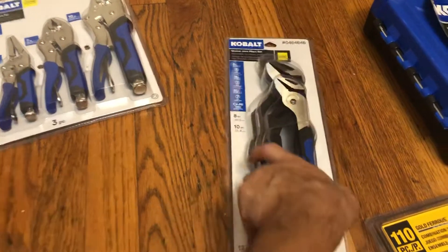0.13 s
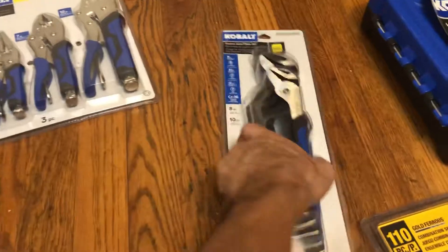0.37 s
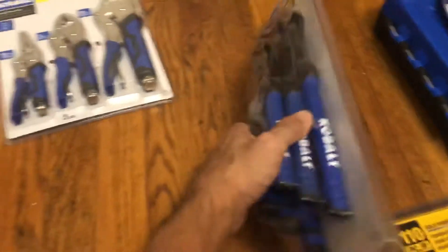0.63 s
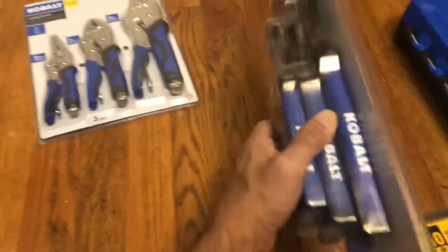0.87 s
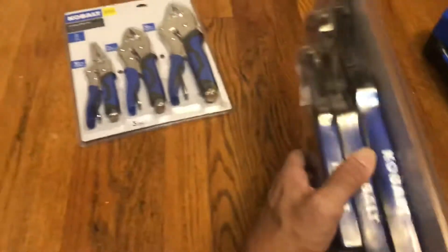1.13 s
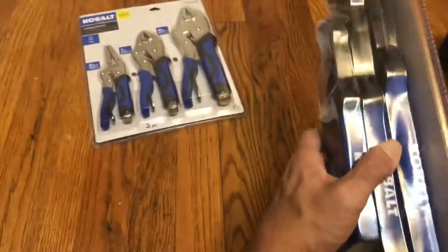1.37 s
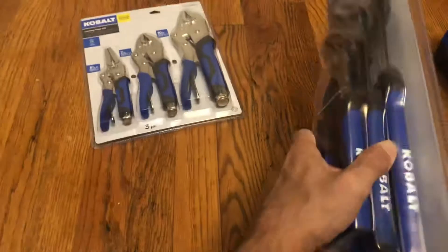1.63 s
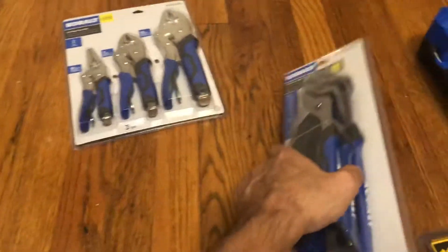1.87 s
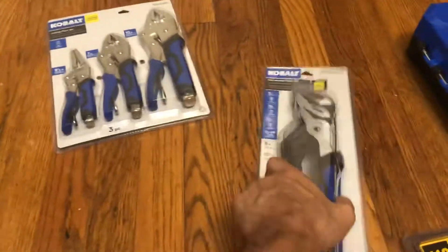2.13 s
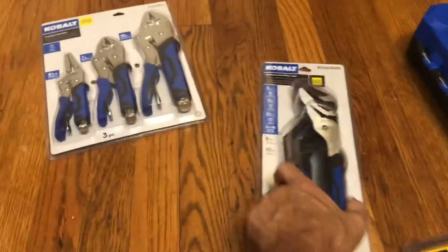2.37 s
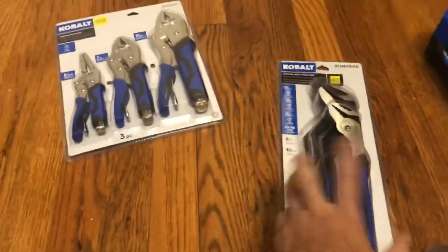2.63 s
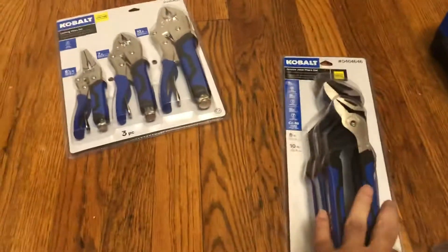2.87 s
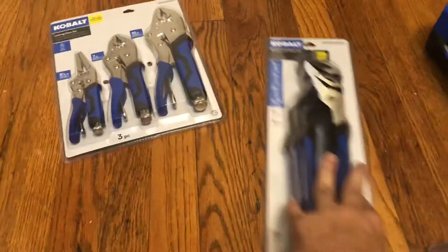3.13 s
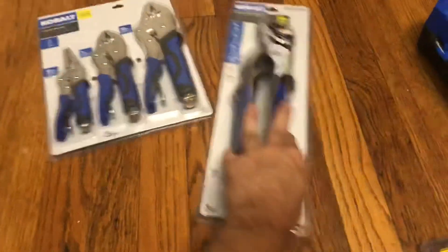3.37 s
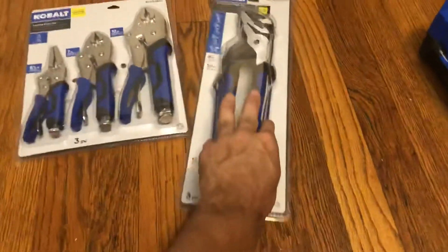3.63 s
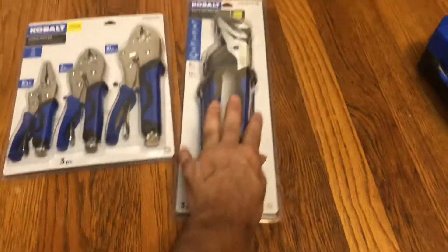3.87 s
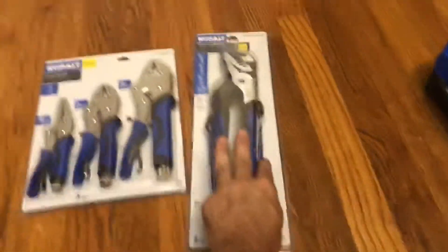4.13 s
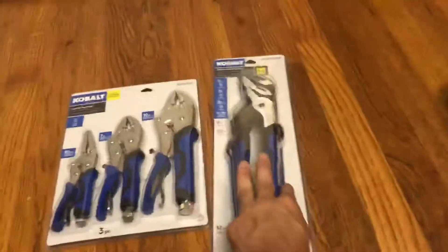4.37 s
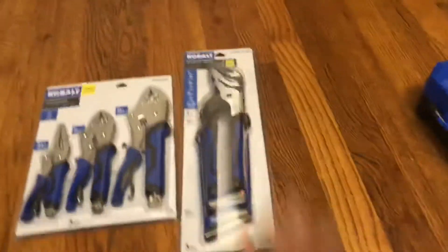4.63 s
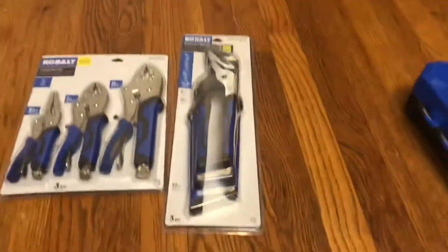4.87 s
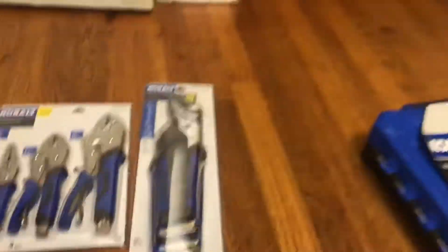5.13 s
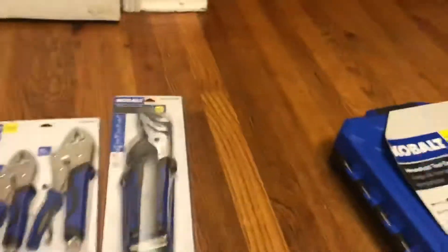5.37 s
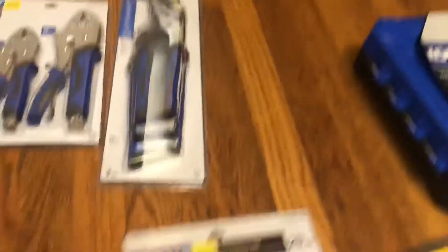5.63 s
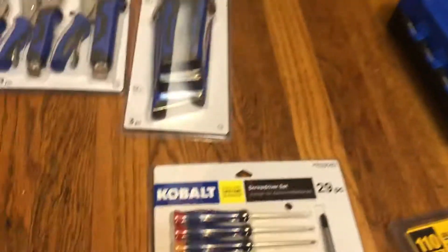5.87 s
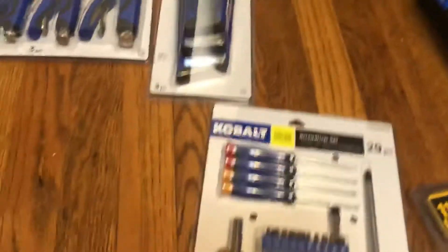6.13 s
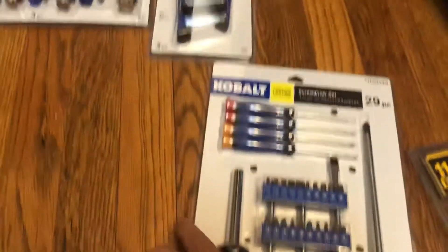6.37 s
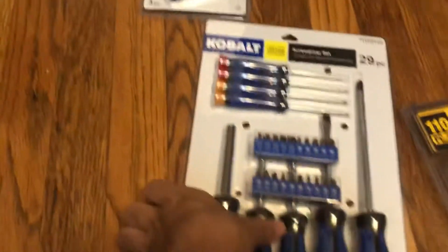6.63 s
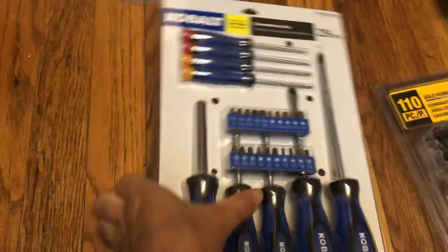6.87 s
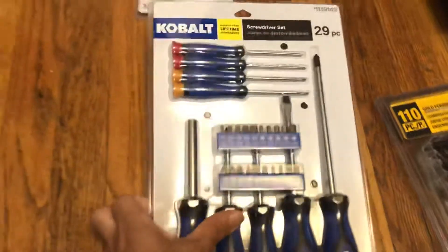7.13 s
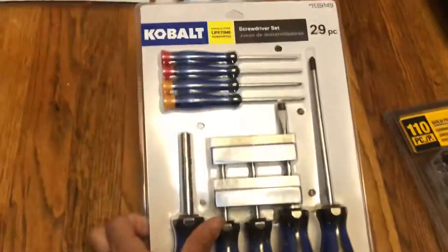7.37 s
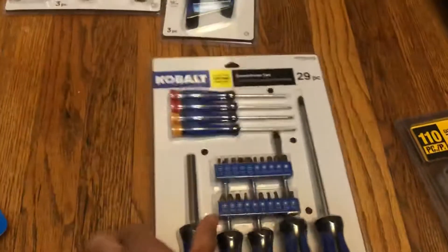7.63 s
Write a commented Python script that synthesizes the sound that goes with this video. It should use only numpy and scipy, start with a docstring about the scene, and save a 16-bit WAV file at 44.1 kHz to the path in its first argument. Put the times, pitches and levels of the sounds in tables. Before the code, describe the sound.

Close plastic packaging snaps, clacks and scrapes over floorboards, the tools inside rattling briefly, against faint room hum and murmur.

```python
"""First a faint rub over a humming room, then small knocks, snaps and longer scrapes, some of them loud:
hard plastic tool packs are gripped, tilted, dropped and pushed along a wooden floor close to a phone.
Knocks and snaps are short bursts of tiny impacts; sliding is a dense stream of them, in strokes that
speed up and slow down. All ring the same boards and shell. Soft bumps, singing and rustles are shaped
noise. A small room adds its echo, and a hum and murmur stand behind."""
import sys
import numpy as np
from scipy import signal
from scipy.fft import rfft, irfft, next_fast_len
from scipy.io import wavfile
from scipy.ndimage import uniform_filter1d

SR = 44100
rng = np.random.default_rng(int(sys.argv[2]) if len(sys.argv) > 2 else 0)


def transcribe(u):
    """Save the signal u as a 16-bit wav file named by the first command-line argument.

    u: samples, shape (n,) or (channels, n), limited to [-1, 1]; the rate is SR.
    q: integer samples, one column per channel.
    """
    v = np.clip(np.atleast_2d(u).T, -1, 1)
    q = np.round(v * 32767).astype(np.int16)
    wavfile.write(sys.argv[1], SR, q)


def ratio(d):
    """dB to gain"""
    e = np.asarray(d, float) / 20
    return 10 ** e


N = 341775  # length in samples

# Resonances of the floor boards, the hollow pack, its stiff shell and its thin edges
# [f/Hz, width/Hz, level within the group/dB]
BOARD_MODES = [(106, 11, -11), (192.7, 52, -3.5), (298, 72, -4), (373, 46.5, -1), (500, 187, 2.5)]
HOLLOW_MODES = [(608, 100, 7), (782, 110, 1.5), (909.5, 78, 0), (1035, 170, -0.5)]
SHELL_MODES = [(1393, 346, 3), (1550, 610, 3), (2100, 380, -2), (2379, 500, 1.5), (2800, 370, -1.5),
               (3325, 560, -2), (3870, 390, -3.5), (4350, 160, -7), (4840, 260, -8.5)]
EDGE_MODES = [(5864, 2800, -0.5), (8100, 3200, -9.5), (9920, 7600, 1), (15000, 2200, -12.5)]

# Echo of the room, band by band [f/Hz, time to fade by 60 dB/s, level/dB]
ROOM_BANDS = [(150, 0.22, -6), (376, 0.3, -6.5), (1057, 0.15, -8), (2540, 0.23, -13.5), (5970, 0.48, -14),
              (13000, 0.13, -10)]
# Colour of the background murmur and hiss [f/Hz, relative level per Hz/dB]
MURMUR_COLOUR = [(18, -51.5), (30, -19), (42, -12), (64, 3), (81, -8), (165, -9.5), (233, -14.5), (311, -7),
                 (336, -14), (499, -17), (554, -33.5), (16000, -56.5)]

# Hits [t/s, shell peak level/dB, then levels against that peak: board thud/dB, hollow/dB, crackle/dB]
# pops of the buckling shell
SNAPS = [(0.26, -38.5, -6, -8, -11.5), (0.29, -50, -7, -4, -16), (0.4935, -27.5, -19, -35, -27),
         (0.839, -58, -15, -11, -32), (0.965, -60.5, 5, 3, -33), (1.536, -53.5, -2, -10, -22),
         (1.656, -50.5, -23, 5.5, -18), (1.6708, -42.5, -15, -1, -20), (1.6978, -42.5, -29, -2.5, -20),
         (1.7487, -45.5, -15, -3, -24), (2.1111, -26, -25, -19, -33), (2.1267, -27.5, -10.5, -10.5, -16.5),
         (2.1603, -18.5, -18, -18, -36), (2.254, -32.5, -3.5, -14, -32), (2.312, -32.5, -14, -17, -10),
         (2.4936, -43, -20.5, -8, -34.5), (4.2004, -50, -1, -2, -21), (4.4602, -38, -30, -6, -41),
         (4.4966, -47.5, -5.5, -1, -19.5), (4.666, -49, -27.5, -25.5, -8), (4.845, -41, -38.5, -4.5, -13.5),
         (4.9347, -28.5, -6.5, -14.5, -12.5), (4.9882, -40.5, -13, -5.5, -18), (5.107, -52, -30, -30, -5),
         (5.447, -18.5, -45, -26, -14), (5.6113, -29.5, -18, 1.5, -34), (5.7699, -25, -13, -8, -13.5),
         (5.7945, -21, -17, -12, -24), (5.8122, -26.5, -15, -13, -27), (5.9898, -35, -33, -26, -31),
         (6.3365, -29, -14, -16, -20), (6.353, -23.5, -8.5, -9, -16), (6.4186, -22.5, -17, -5.5, -11.5),
         (6.6084, -52, -1, 3, -6), (6.746, -49, -18, -20, -7), (6.777, -24.5, -18, -18, -21),
         (6.8385, -23, -32, -7, -36), (6.941, -42.5, -20, -13, -28), (6.963, -45.5, -9, -8, -30),
         (7.0344, -43, -7, -29, -12), (7.375, -46.5, -15, -13, -12), (7.412, -42.5, -20, -8, -40),
         (7.49, -39, -19, -9, -22), (7.5555, -18, -13.5, -6, -33), (7.5715, -31, -13, 16, -9),
         (7.6062, -21.5, -41, -3.5, -29.5), (7.667, -46, -18, -8, -12), (7.6964, -34.5, -8, 13, -24)]
# a pack or its tools landing: many contacts in a few ms
KNOCKS = [(0.221, -48, 2.5, -1, -18), (1.0482, -40, -14, -12, -16), (1.1663, -49.5, -12, -11, -23),
          (1.1932, -45, -16, -10, -18), (1.8732, -23, -5.5, -5, -13.5), (2.0668, -34.5, -4, -2.5, -12),
          (2.247, -35, -4, -12, -16.5), (2.2781, -4.5, -11.5, -9, -18.5), (2.333, -31.5, -16, -6, -28),
          (2.355, -40, -8, -8, -30), (2.794, -48, -2, -3, -17.5), (2.813, -26.5, -11, -12, -20),
          (3.3158, -26.5, -31, -19, -19), (6.048, -9.5, -32, -16.5, -14), (6.0707, -20, -17.5, -33, -42),
          (6.3088, -48, -4, -3, -13), (6.4398, -41, -8, 3.5, -13), (6.718, -48.5, -17, 1.5, -16),
          (6.7393, -37.5, -11, -7, -28), (6.7831, -25.5, -7.5, -7.5, -15), (6.8209, -42, -25, -5, -21),
          (7.1176, -52, 4, 3, -13), (7.548, -9.5, -17, -12.5, -16.5), (7.6791, -38, -9, 10, -5),
          (7.7114, -14.5, -29, -8.5, -22)]
# the shell rocks or twists: contacts smeared into one blurred bump
CLATTERS = [(2.822, -40, 1.5, 1, -24), (3.329, -22, -16.5, -12, -20), (3.342, -33, -9, -1.5, -13),
            (3.364, -26, -17, -4, -16), (3.496, -32, -14, -10, -26), (3.52, -40, -2, -8, -28),
            (6.669, -38, -12, -5, -34), (6.755, -27.5, -22, -14, -22), (7.351, -39, -12.5, -6, -11)]
# Some hits land where one pitch of board or shell rings most [t of the hit/s, favoured f/Hz, lift/dB]
SPOTS = [(1.0486, 2230, 3), (2.1603, 200, 14), (2.2782, 402, 5), (2.333, 800, 15), (2.356, 382, 20),
         (4.2004, 960, 17), (4.4602, 1000, 15.5), (4.9347, 970, 15.5), (4.9882, 800, 9), (5.447, 3640, 10),
         (5.6113, 980, 7), (5.7947, 877, 8), (6.353, 1500, 6.5), (6.4186, 1250, 17), (6.787, 557, 5),
         (6.8402, 1670, 16), (7.5486, 1370, 6)]

# Rubbing on the boards and in the hand, one row a stroke
# [t when fastest/s, speeding up/s, slowing down/s, shell level/dB, weight/dB]
STROKES = [(0, 0.23, 0.23, -62.5, 1.5), (0.314, 0.12, 0.093, -49, -8), (0.54, 0.13, 0.065, -40.5, -18),
           (.575, 0.13, 0.028, -52.5, 12), (.63, 0.13, 0.086, -59.5, 2), (.92, 0.054, 0.26, -76, 14),
           (1.71, 0.086, 0.15, -65, 18.5), (2.07, 0.17, 0.16, -56.5, 0), (2.15, 0.16, 0.32, -48, -1),
           (2.965, 0.035, 1, -49.5, -12), (3.28, 0.37, 0.26, -39.5, -13), (3.36, 0.07, 0.19, -43.5, -3),
           (3.681, 0.33, 0.31, -46, -8.5), (3.92, 0.15, 0.12, -57.5, 0), (4.07, 0.11, 0.21, -54.5, -8.5),
           (4.3, 0.054, 0.12, -51.5, -8), (4.419, 0.19, 0.11, -46, -10), (4.88, .04, 0.077, -63.5, 0),
           (5.1, 0.25, 0.36, -50.5, -6), (5.4, 0.15, 0.094, -45.5, 7.5), (5.52, 0.57, 0.28, -37.5, -7.5),
           (5.84, 0.28, 0.26, -61.5, 12.5), (6.07, 0.27, 0.24, -41.5, -9.5), (6.255, .025, 0.03, -55, -28),
           (6.392, 0.13, 0.28, -55, 2), (6.64, 0.096, 0.42, -62, 2), (6.869, 0.18, 0.093, -48.5, -3),
           (7.08, 0.29, 0.29, -58.5, -10), (7.145, 0.021, 0.25, -60.5, 11.5),
           (7.22, 0.24, 0.28, -64.5, -15), (7.39, 0.081, 0.099, -61.5, -16),
           (7.46, 0.15, 0.13, -59.5, 10.5), (7.639, .06, 0.2, -49.5, -10), (7.735, 0.16, .1, -41, -1)]
# A hand squeezes the shell [start t/s, end t/s]
GRIPS = [(.23, .35), (.5, .56), (6.52, 6.92), (7.35, 7.44)]
# Colour of the wider second pack when rubbed [f/Hz, level/dB]
SECOND_PACK_COLOUR = [(100, 2), (300, -5), (520, -18.5), (800, 4), (1300, 0), (3000, -1.5), (7000, 4.5),
                      (14000, -8.5)]
# Colour of the narrow pack pushed flat under three fingers [f/Hz, level/dB]
PUSHED_COLOUR = [(100, 14), (200, 2.5), (600, 1.5), (900, -3), (1460, 1), (2000, 0.5), (4400, 1.5),
                 (11000, -2)]

# Singing edges and short high rustles [start t/s, length/s, f/Hz, width/Hz, level/dB]
SINGING_AND_RUSTLES = [(2.05, 0.06, 1930, 340, -41), (2.94, 0.282, 4440, 300, -53),
                       (4.93, 0.55, 1100, 870, -52.5), (6.84, 0.084, 8400, 4300, -53.5),
                       (6.62, 0.013, 10000, 7200, -50.5), (3.5, 0.041, 14000, 9800, -59.5)]
# Soft low bumps of hand or card on the boards [t of the middle/s, rise and again fall/s, f/Hz, level/dB]
SOFT_BUMPS = [(0.308, 0.13, 107, -52), (2.187, 0.078, 104, -43), (2.843, 0.046, 98.26, -43),
              (3.41, 0.14, 98.9, -49.5), (4.977, 0.11, 150, -52.5), (6.11, 0.084, 169, -48),
              (6.334, 0.075, 196, -44.5), (6.431, 0.03, 180, -40), (6.533, 0.15, 200, -51),
              (7.711, 0.051, 191, -39)]

TOP_HZ = 15900  # upper end of the sound


def unit(x):
    """Scale to an rms (average strength) of 1."""
    return x / np.sqrt(np.mean(x ** 2))


def ring(x, hz, width):
    """A resonance that keeps the energy of a click."""
    b, a = signal.iirpeak(hz, hz / width, fs=SR)
    return signal.lfilter(b, a, x) * np.sqrt(SR / (np.pi * width))


def dull(x, hz):
    """A mode takes up little of a click far from its own pitch."""
    band = [hz / 4, min(hz, SR / 2.5)]
    b, a = signal.butter(1, band, "band", fs=SR)
    return signal.lfilter(b, a, x)


def walk(rate):
    """Random levels, a new one every 1 / rate s with a glide between them; rms 1."""
    hold = int(SR / rate)
    levels = np.repeat(rng.standard_normal(N // hold + 1), hold)
    return unit(uniform_filter1d(levels, hold)[:N])


def shares(modes):
    """Turn each mode's level into its part of the group's power."""
    total = np.sqrt(sum(ratio(db) ** 2 for _, _, db in modes))
    return [(hz, width, ratio(db) / total) for hz, width, db in modes]


def quiet():
    """Wavering murmur of the house with faint microphone hiss, plus a steady low band of hum."""
    murmur_db, waver_db = -60, 0.93
    hum_hz, hum_width_hz, hum_db = 58.3, 29, -62.5
    size = next_fast_len(N)
    hz = np.arange(1, size // 2 + 2) * SR / size
    colour_hz, colour_db = np.transpose(MURMUR_COLOUR)
    colour = ratio(np.interp(np.log(hz), np.log(colour_hz), colour_db))
    noise = irfft(rfft(rng.standard_normal(size)) * colour, size)[:N]
    murmur = ratio(murmur_db + waver_db * walk(2.4)) * unit(noise)
    hum = dull(ring(rng.standard_normal(N), hum_hz, hum_width_hz), 2 * hum_hz)
    return murmur + ratio(hum_db) * unit(hum)


def room(x, first_s=0.0023):
    """Walls send back a dense tail of noise; each band fades at its own pace."""
    t = np.arange(SR // 2) / SR
    tail = 0
    for hz, t60, db in ROOM_BANDS:
        echo = ring(rng.standard_normal(len(t)), hz, hz * 0.71)
        echo = echo * ratio(-60 * t / t60) * (t > first_s)
        echo = echo / np.sqrt(np.sum(echo ** 2))
        tail = tail + ratio(db) * echo * np.sqrt(hz / SR * 2)
    return signal.fftconvolve(x, tail)[:N]


def bumps(width=0.52):
    """A short soft shove of noise into one low board mode; width is a share of its pitch."""
    t = np.arange(N) / SR
    out = 0
    for s, side_s, hz, db in SOFT_BUMPS:
        shove = np.cos(np.pi * np.clip((t - s) / side_s, -1, 1) / 2) ** 2
        thud = dull(ring(rng.standard_normal(N), hz, width * hz), 2 * hz)
        out = out + ratio(db) * shove * unit(thud)
    return out


def singing_and_rustles(fade_s=0.017):
    """Shaped bands of noise, from narrow singing to wide rustle."""
    t = np.arange(N) / SR
    out = 0
    for start, length, hz, width, db in SINGING_AND_RUSTLES:
        on = np.clip(np.minimum(t - start, start + length - t) / fade_s + .5, 0, 1)
        noise = ratio(db) * on * rng.standard_normal(N)
        band = ring(ring(noise, hz, width), hz, 2 * width)
        out = out + band * np.sqrt(width / SR * 2 * np.pi)
    return out


def tint_db(hz):
    """Colour of whichever pack is sliding, for one mode."""
    t = np.arange(N) / SR
    packs = (
        (4.75, 5.76, SECOND_PACK_COLOUR),  # start s, end s: the wider pack is dragged in
        (2.9, 3.95, PUSHED_COLOUR),
    )
    total_db = 0
    for start, end, colour in packs:
        colour_hz, colour_db = np.transpose(colour)
        lift_db = np.interp(np.log(hz), np.log(colour_hz), colour_db)
        total_db = total_db + ((t > start) & (t < end)) * lift_db
    return total_db


def stroke_effort():
    """Each stroke's level swells to its fastest moment and sinks; after a knock the tools rattle on."""
    step = 64  # samples between points of the curve
    foot_db, roundness = -24, 1.49  # level at both ends of a stroke; 1 = pointed, 2 = rounded
    rattle_fall_s, rattle_db, rattle_weight_db = 0.22, -37, 3.6  # rattle_db is against the knock
    t = np.arange(0, N, step) / SR
    rattles = [(knock[0] + 0.0031, .008, rattle_fall_s, knock[1] + rattle_db, rattle_weight_db)
               for knock in KNOCKS]
    s, rise, fall, shell_db, weight_db = np.transpose(STROKES + rattles)[:, :, None]
    away = np.where(t < s, (s - t) / rise, (t - s) / fall)
    effort_db = shell_db + foot_db * away ** roundness
    return t, effort_db, shell_db, weight_db


def crease_ticks(ticks_per_s=320, tick_db=38.0):
    """Under the fingers, creases of the shell give way with small ticks."""
    at = np.arange(N)
    held = sum((at > start * SR) & (at < end * SR) for start, end in GRIPS)
    ticks = held * rng.random(N) * (rng.random(N) < ticks_per_s / SR)
    return ratio(tick_db) * uniform_filter1d(ticks, size=60)


def slide(grit_db=2.5, judder_db=1.4, uneven_db=0.2, patchy_db=1.9):
    """Edges catch on the grain of the wood in a dense stream, varying in its own way for each mode."""
    # a stroke that bears down rings board and hollow and muffles the hiss:
    # (dB against the shell, dB per dB of weight, dB at rest)
    groups = (
        (BOARD_MODES, -2.5, 0.57, -67.5),
        (HOLLOW_MODES, 0, 0.74, -81),
        (SHELL_MODES, 0, 0, -77.5),
        (EDGE_MODES, -12.5, -0.43, -77.5),
    )
    # the hiss grows more slowly than the shell: dB per dB, counted from this level
    hiss_follows, hiss_even_db = 0.78, -41.5
    hiss_dulls = 0.4  # the top of the hiss fades first as a stroke slows: dB per dB and octave
    t, effort_db, shell_db, weight_db = stroke_effort()
    catches_db = grit_db * np.minimum(rng.exponential(size=N), 6)
    grit = unit(ratio(catches_db + judder_db * walk(70) + uneven_db * walk(25)))
    creases = crease_ticks()
    pushes = []
    for modes, db, per_weight, rest_db in groups:
        is_edge = modes is EDGE_MODES
        driven_db = effort_db + is_edge * (hiss_follows - 1) * (shell_db - hiss_even_db)
        rubbing = grit + (not is_edge) * creases
        for hz, width, share in shares(modes):
            octaves = np.log2(hz / EDGE_MODES[0][0])
            dulled_db = is_edge * hiss_dulls * octaves * (effort_db - hiss_even_db)
            stroke_db = driven_db + dulled_db + db + per_weight * weight_db
            power = np.sum(ratio(stroke_db) ** 2, axis=0) + ratio(rest_db) ** 2
            push = rubbing * np.interp(np.arange(N) / SR, t, np.sqrt(power))
            patches = ratio(patchy_db * walk(25) + tint_db(hz))
            pushes.append(share * push * rng.standard_normal(N) * patches)
    return np.array(pushes)


def spot_db(s, hz):
    """Lift of one mode for each hit, from where the hit lands."""
    width_octaves, rest_share = 0.37, 0.51  # width of the lift; the share of it other pitches lose
    at, favoured, lift_db = np.transpose(SPOTS)[:, :, None]
    near = np.abs(s - at) < 1 / 200
    bell = np.exp(-(np.log2(hz / favoured) / width_octaves) ** 2)
    return np.sum(near * lift_db * (bell - rest_share), axis=0)


def hits(table, ms, count, bunched, scatter_db=4.5, place_db=3.0, spread=.04, soften=0.01, fading_db=1.5):
    """A burst of small impacts that softens; where it lands sets how much each mode rings."""
    shell_ring_db = -10  # ring of the shell under the peak of a hit
    heard_s = .008  # a hit's energy counts over this time
    s, peak_db, board_db, hollow_db, edge_db = np.transpose(table)
    late = rng.random((len(s), count)) ** bunched * ms / 1000
    late -= late.min(axis=1, keepdims=True)
    size = rng.standard_normal((len(s), 2, count))
    force_db = scatter_db * size[:, 0] - fading_db * late * 1000 / ms
    force = ratio(force_db) * np.sign(size[:, 1])
    groups = ((BOARD_MODES, board_db), (HOLLOW_MODES, hollow_db),
              (SHELL_MODES, shell_ring_db), (EDGE_MODES, edge_db))
    pushes = []
    for modes, db in groups:
        for hz, width, share in shares(modes):
            place = rng.standard_normal(len(s))
            gain = share * ratio(peak_db + db + place_db * place + spot_db(s, hz))
            gain *= (-1) ** len(pushes)  # neighbouring modes push opposite ways
            # later contacts are softer and carry less treble
            felt = force * np.exp(-soften * late * hz)
            # a slow mode feels the burst more as one blow, a quick one feels the contacts apart
            blow = np.abs(np.sum(felt * np.exp(2j * np.pi * hz * late), axis=1)) ** 2
            apart = np.sum(felt ** 2, axis=1)
            quick = np.clip(width * ms / 3000, .3, 1)
            gain *= np.sqrt(heard_s * SR / (quick * apart + (1 - quick) * blow))
            # bending waves: low tones travel slower and arrive later
            travel = spread * (hz ** -.5 - TOP_HZ ** -.5)
            at = np.clip((s[:, None] + late + travel) * SR, 0, N - 1).astype(int).ravel()
            pushes.append(np.bincount(at, (felt * gain[:, None]).ravel(), N))
    return np.array(pushes)


def scene():
    """Packs, room and hum at one microphone."""
    pushes = slide()
    pushes = pushes + hits(SNAPS, ms=2.6, count=8, bunched=1.6)
    pushes = pushes + hits(KNOCKS, ms=11.0, count=60, bunched=1.7)
    pushes = pushes + hits(CLATTERS, ms=15.0, count=90, bunched=0.85, soften=.004, fading_db=10.0)
    modes = BOARD_MODES + HOLLOW_MODES + SHELL_MODES + EDGE_MODES
    packs = singing_and_rustles() + bumps()
    for push, (hz, width, _) in zip(pushes, modes):
        packs = packs + dull(ring(push, hz, width), 2 * hz)
    return (packs + room(packs) + quiet())[None]


def band_limit(x):
    """A steep low-pass at the top of the band."""
    return signal.sosfilt(signal.butter(12, 17000, fs=SR, output="sos"), x)


def record(dry):
    """The phone rounds the loudest peaks, then trims the lowest bass and the top."""
    ceiling = 1  # loud peaks round off towards this
    rounded = ceiling * np.tanh(dry / ceiling)
    no_rumble = signal.sosfilt(signal.butter(2, 45, "high", fs=SR, output="sos"), rounded)
    mix = signal.sosfilt(signal.ellip(6, .3, 40, TOP_HZ, fs=SR, output="sos"), no_rumble)
    return band_limit(mix)


dry = scene()
out = record(dry)
transcribe(out)
```